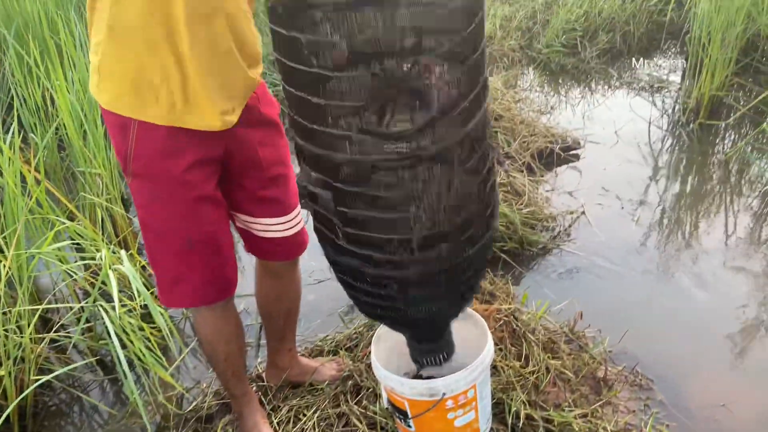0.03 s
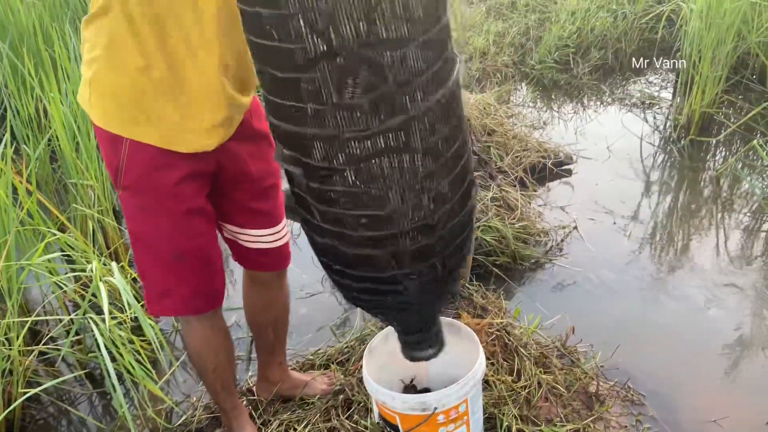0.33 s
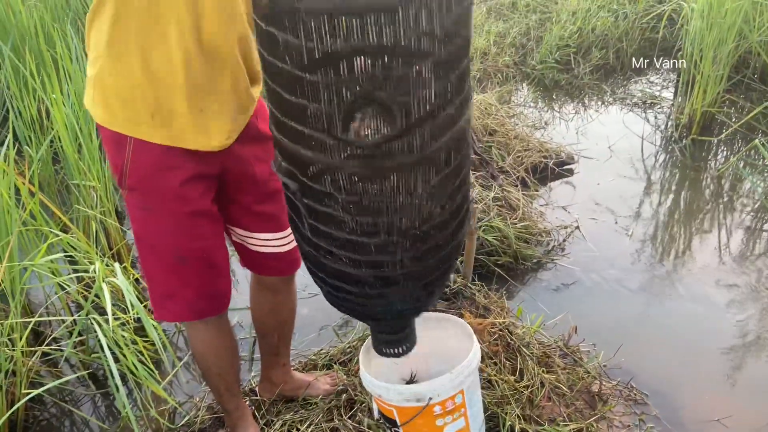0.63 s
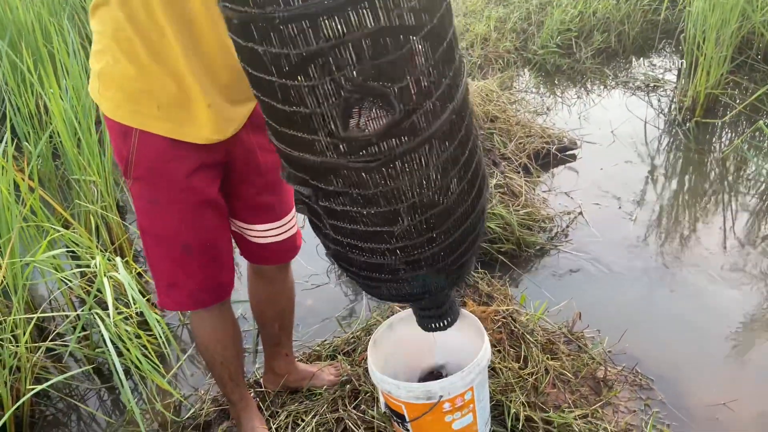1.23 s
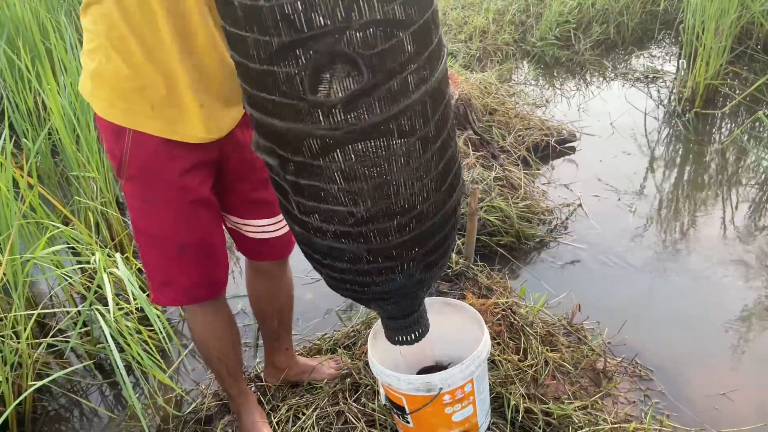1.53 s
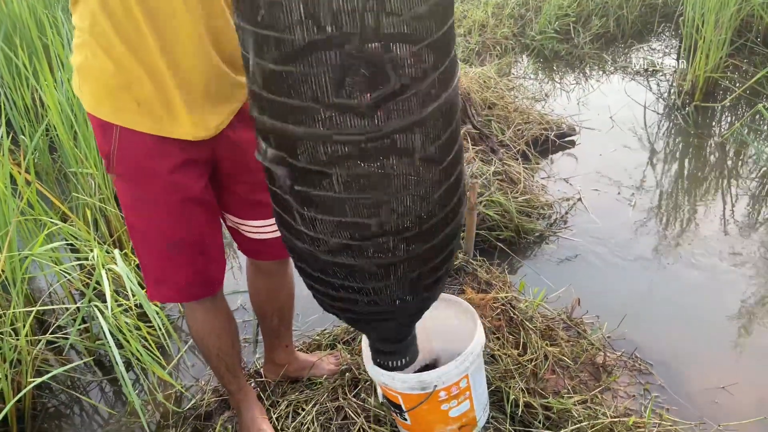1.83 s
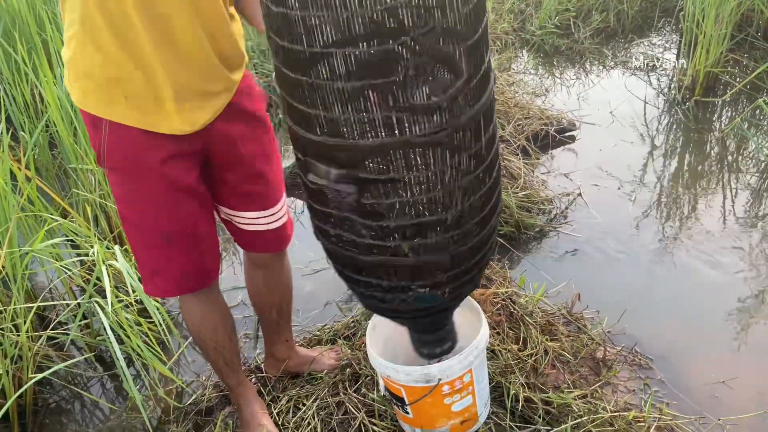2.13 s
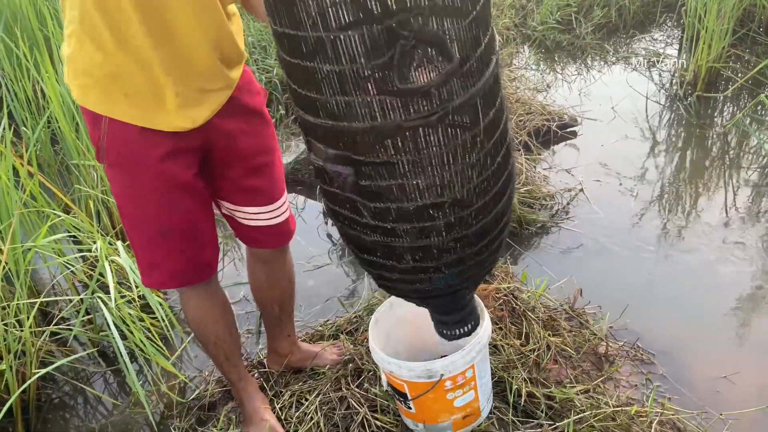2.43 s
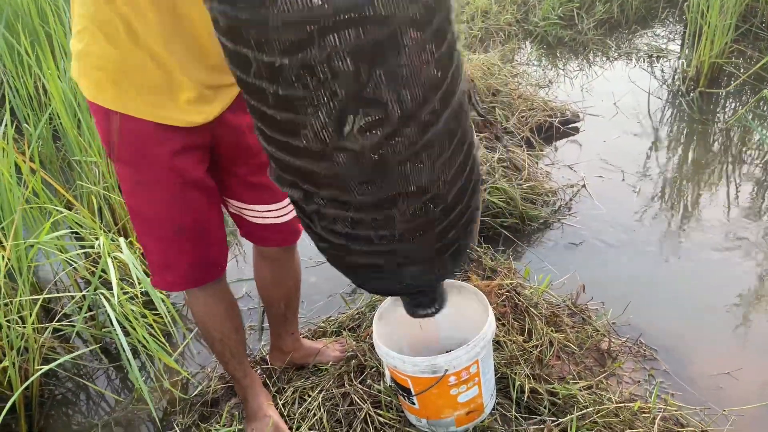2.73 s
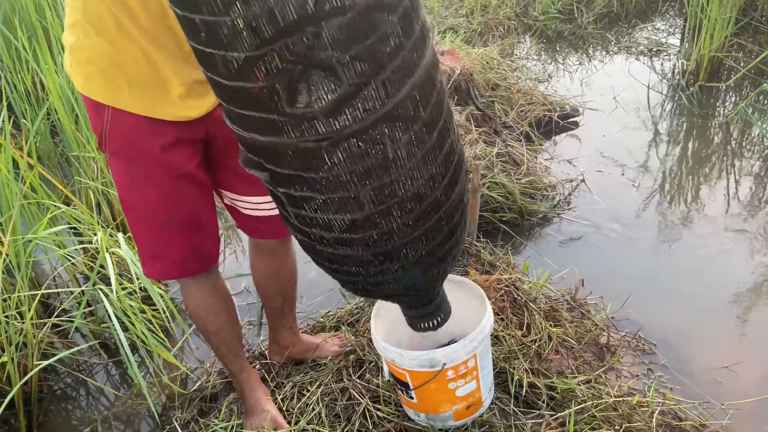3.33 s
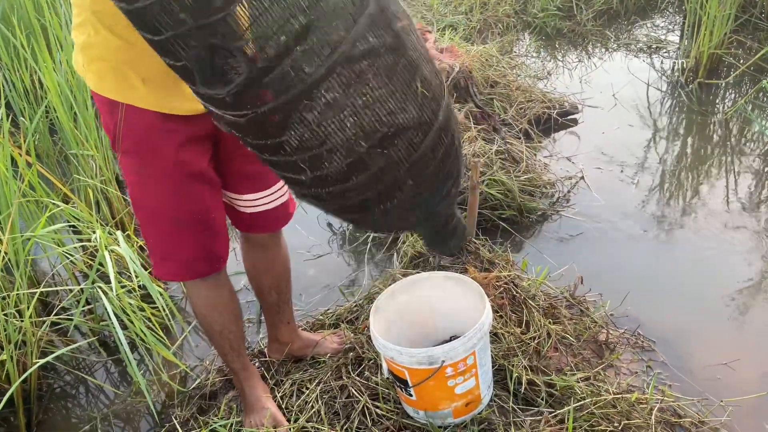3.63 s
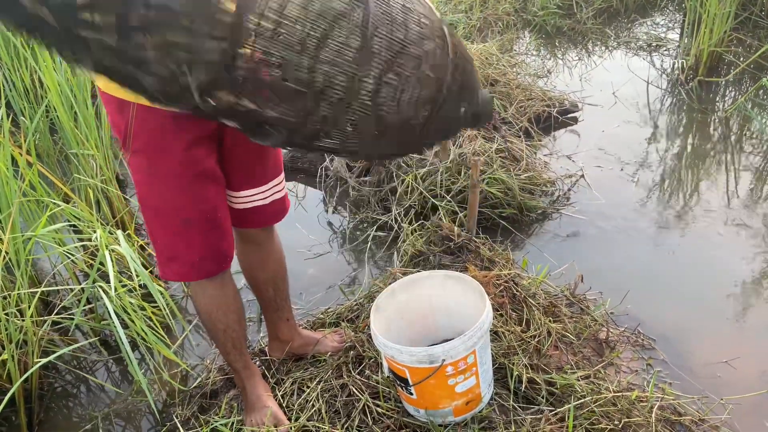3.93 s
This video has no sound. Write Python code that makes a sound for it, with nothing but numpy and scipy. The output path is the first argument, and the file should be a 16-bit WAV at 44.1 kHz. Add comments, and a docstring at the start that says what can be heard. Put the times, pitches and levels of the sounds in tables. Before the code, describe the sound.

A woven fish trap is shaken out close by, its wet catch slithering and bumping in the rustling weave after a light bucket knock at the start. Slats snap sharply near 0.9, 1.6, 2.5 and 2.6 seconds. Around 3 seconds the catch drops into the plastic bucket with hollow knocks; rustles and drips continue until 4 seconds. A cricket chirps over distant insects and a low rumble.

```python
"""A woven fish trap is shaken out over a plastic bucket on a grassy riverbank.
Throughout: low rumble, far insect chorus, a near cricket chirping in runs of wing strokes.
After a first knock of the bucket, the wet catch slithers and bumps in the rustling weave.
Slats spring back with sharp snaps near 0.9, 1.6, 2.5 and 2.6 s.
Near 3 s the catch drops in and rings the bucket; rustle and drips go on to the end."""
import sys
import numpy as np
from scipy import signal
from scipy.fft import rfft, irfft, next_fast_len
from scipy.io import wavfile
from scipy.ndimage import map_coordinates

SR = 44100
rng = np.random.default_rng(int(sys.argv[2]) if len(sys.argv) > 2 else 0)


def wrap_up_sound(samples):
    """Save the sound to the file named by the first command line argument, as 16-bit audio."""
    columns = np.atleast_2d(samples).T
    # keep every value between -1 and 1, then stretch to whole-number steps
    tamed = np.clip(columns, -1, 1)
    steps = np.round(tamed * 32767).astype(np.int16)
    wavfile.write(sys.argv[1], SR, steps)


N = 176400
T = np.arange(N) / SR

# bucket modes (frequency [Hz], level [dB], t60 [s])
BUCKET_MODES = [(276.6, -12, 0.1), (304.4, -4, 0.082), (633, -11, 0.024), (900, -3, 0.094),
                (1115, -24, 0.21), (1410, -23, 0.21), (1857, -5.5, 0.062), (2570, -9.5, 0.044)]
# left-right likeness of the sound field (frequency [Hz], correlation [-])
COHERENCE = [(100, 0.9), (1900, 0.96), (2400, 0.5), (2900, 0.1), (3400, 0.083), (3800, 1), (4400, 0.9),
             (5000, 0.81), (7000, 0.54), (8300, 0.87), (11000, 0.89)]


def amp(db):
    """Decibels to gain."""
    return 10 ** (np.asarray(db) / 20)


def unit(x):
    """Scale to rms 1."""
    return x / np.sqrt(np.mean(x ** 2) + 1e-20)


def along(points, hz):
    """Interpolate (frequency [Hz], value) points on a log axis."""
    f, v = np.transpose(points)
    return np.interp(np.log(hz + 1), np.log(f + 1), v)


def wobble(knots_per_s):
    """Smooth random curve."""
    return map_coordinates(rng.standard_normal(int(N * knots_per_s / SR) + 4), [T * knots_per_s])


def filtered(x, response):
    """Apply a frequency response."""
    n = x.shape[-1]
    m = next_fast_len(n + 4096)
    return irfft(rfft(x, m) * response(np.fft.rfftfreq(m, 1 / SR)), m)[..., :n]


def spread(pair, gain, coherence=COHERENCE):
    """Two unrelated signals to coloured stereo of given coherence."""
    angle = lambda hz: np.arccos(np.clip(along(coherence, hz), -1, 1)) / 2
    mid, side = filtered(pair, lambda hz: gain(hz) * np.array([np.cos(angle(hz)), np.sin(angle(hz))]))
    return np.array([mid + side, mid - side])


def noise(gain, size, coherence=COHERENCE):
    """Coloured stereo noise."""
    return spread(rng.standard_normal((2, size)), gain, coherence)


def envelope(t, attack_s, hold_s, t60_s):
    """Linear rise; exponential fall from hold_s on."""
    return np.clip(t / attack_s, 0, 1) * amp(-60 * np.maximum(t - hold_s, 0) / t60_s)


def add(track, at_s, sound):
    """Mix a sound in."""
    i = max(round(at_s * SR), 0)
    part = sound[..., :max(N - i, 0)]
    track[..., i:i + part.shape[-1]] += part


def outdoors():
    """Far low rumble and faint open air."""
    # spectra (frequency [Hz], level [dB])
    rumble_spectrum = [(28, -38), (43, -5.5), (80, 1), (120, -5.5), (200, -18.5), (1000, -69)]
    air_spectrum = [(100, -3), (400, 1), (1000, -1.5), (2000, -2), (3000, -2.5), (6000, -5.5), (11000, 1.5),
                    (13000, -51)]
    rumble = unit(noise(lambda hz: amp(along(rumble_spectrum, hz)), N))
    air = unit(noise(lambda hz: amp(along(air_spectrum, hz)), N))
    return amp(-47.5 + wobble(4.4)) * rumble + amp(-61) * air


def chorus():
    """Many far insects blur into pulsing bands."""
    # insect bands (centre [Hz], width [Hz], level [dB], left-right correlation [-], pulse rate [Hz])
    bands = [(6980, 240, -51, 0.39, 62), (8980, 320, -55, 0.77, 150), (10664, 420, -55, 1, 110)]
    out = np.zeros((2, N))
    for hz, width_hz, db, coherence, pulse_hz in bands:
        shape = lambda f: (1 + ((f - hz) / (2 * width_hz)) ** 2) ** -2.0
        band = unit(noise(shape, N, [(hz, coherence)]))
        phase = 2 * np.pi * np.cumsum(pulse_hz * (1 + .05 * wobble(20))) / SR
        out += amp(db + wobble(14)) * (1 + .35 * np.sin(phase)) * band
    return out


def cricket(strokes=11, stroke_s=.0085, period_s=.0081, pitch_hz=8490, glide_hz=1630):
    """Each chirp swells through a run of wing strokes; each stroke glides down in pitch."""
    # runs of evenly spaced chirps (first chirp end [s], last chirp end [s], chirps [count])
    runs = [(.049, 2.859, 24), (2.993, 3.497, 5)]
    swell_db, growth_db_per_s = 6, 1
    out, t = np.zeros(N), T[:SR // 80]
    progress = np.clip(t / stroke_s, 0, 1)
    window = np.sin(np.pi * progress) ** 2
    for end_s in np.concatenate([np.linspace(*run) for run in runs]):
        chirp_db = -40 + growth_db_per_s * (end_s - 2)
        for k in range(strokes):  # last stroke first
            late, sharp, loud = rng.standard_normal(3)
            at_s = end_s - k * period_s - stroke_s / 2 + .0003 * late
            hz = pitch_hz + 55 * sharp + glide_hz * (.5 - progress)
            db = chirp_db + loud - swell_db * (k / (strokes - 1)) ** 2.24
            if at_s > 0:
                add(out, at_s, amp(db) * window * np.sin(2 * np.pi * np.cumsum(hz) / SR))
    grass_echo = noise(np.ones_like, SR // 10) * amp(-60 * T[:SR // 10] / .072)
    grass_echo /= np.linalg.norm(grass_echo[0])
    return out + amp(-1) * signal.fftconvolve(out[None], grass_echo, axes=1)[:, :N]


def slat_resonances(depth_db, size=110):
    """Each blow excites the many resonances differently: a random gain over frequency."""
    knots_db = depth_db * rng.standard_normal(size)
    return lambda hz: amp(np.interp(np.sqrt(2 * hz / SR), np.linspace(0, 1, size), knots_db))


def squelches(pops_per_s=110, centre_hz=1476, t60_cycles=8, size=900):
    """Tiny wet pops, each ringing briefly at its own pitch."""
    out, t = np.zeros(N), T[:SR // 25]
    for (when, draw), (pitch, loud) in zip(rng.random((size, 2)), rng.standard_normal((size, 2))):
        if draw < pops_per_s * N / SR / size:
            hz = centre_hz * np.exp(.33 * pitch)
            pop = envelope(t, .001, 0, t60_cycles / hz) * np.sin(2 * np.pi * hz * t)
            add(out, when * N / SR, amp(12.6 * np.tanh(loud)) * pop)
    return unit(out)


def rustle(grains_per_s=150, grain_t60_s=.045, hiss=.75, size=4000):
    """The weave creaks in tiny grains as the wet catch slithers over it in fits and starts."""
    # rustle contour (time [s], level [dB])
    contour = [(0, -57.5), (.56, -60), (.62, -51.5), (.81, -45.5), (.92, -52.5), (1.08, -49), (1.36, -55.5),
               (1.62, -56.5), (1.8, -51), (2.12, -48.5), (2.55, -49.5), (2.92, -48), (3.2, -48.5),
               (3.45, -54), (4, -50.5)]
    # weave spectrum (frequency [Hz], level [dB])
    spectrum = [(100, -9), (280, 4), (450, -10.5), (800, 0.5), (1900, 0.5), (2800, -3), (4500, -7.5),
                (6000, -7.5), (11000, -24), (13500, -54)]
    when, draw, strength = rng.random((3, size))
    active = draw < grains_per_s * N / SR / size
    kicks = np.bincount((when * N).astype(int), active * amp(-3.5 * np.log(strength + .02)), N)
    grains = unit(signal.fftconvolve(kicks, amp(-60 * T[:SR // 20] / grain_t60_s))[:N])
    slats = slat_resonances(1.8)
    friction = rng.standard_normal((2, N)) * (grains + hiss)
    weave = unit(spread(friction, lambda hz: slats(hz) * amp(along(spectrum, hz))))
    wet_weave = amp(-1.5) * weave + amp(-9) * squelches()
    return wet_weave * amp(np.interp(T, *np.transpose(contour)) + wobble(16))


def wet_clicks(t60_cycles=13, spray_db=-2):
    """Wet skin and drops smack on the slats: a short pitched ring with a little spray."""
    # smacks and drips (time [s], level [dB], pitch [Hz])
    smacks = [(0.715, -38, 1650), (0.783, -31.5, 2000), (1.165, -33.5, 1800), (1.221, -39, 1630),
              (1.8565, -28, 1230), (1.917, -39.5, 1460), (2.021, -40, 1730), (2.22, -33, 1950),
              (2.273, -30, 1180), (3.179, -34, 5400), (3.209, -36.5, 1540), (3.286, -36, 1100),
              (3.464, -37, 5300), (3.5384, -39.5, 1560), (3.863, -40, 900)]
    out, t = np.zeros((2, N)), T[:SR // 15]
    for at_s, db, hz in smacks:
        spray = unit(noise(lambda f: 1 / (1 + (2 * np.log((f + 1) / hz)) ** 2), len(t)))
        smack = np.sin(2 * np.pi * hz * t) + amp(spray_db) * spray
        add(out, at_s, amp(db) * envelope(t, .00036, .00058, t60_cycles / hz) * smack)
    return out


def slat_ticks():
    """Single slats click against their binding."""
    # light ticks (time [s], level [dB])
    ticks = [(1.769, -36), (2.340, -33), (2.462, -33.5), (2.502, -36.5), (2.6215, -32), (2.7157, -31),
             (2.849, -35.5), (2.8887, -32), (3.057, -31.5), (3.697, -34.5)]
    # slat spectrum (frequency [Hz], level [dB])
    spectrum = [(300, -5), (1500, 5), (4000, 1), (8000, 1), (11500, 7.5), (13500, -17), (16000, -14)]
    out, t = np.zeros((2, N)), T[:SR // 10]
    for at_s, db in ticks:
        slat = unit(noise(lambda hz: amp(along(spectrum, hz)), len(t)))
        add(out, at_s, amp(db) * envelope(t, .0003, .0012, .022) * slat)
    return out


def stick_slip(t, slips_per_s=420, depth_db=4):
    """A sliding body catches and lets go: a fast uneven gain of rms 1."""
    knots = rng.standard_normal(int(t[-1] * slips_per_s) + 4)
    return unit(amp(depth_db * map_coordinates(knots, [t * slips_per_s])))


def catch_bumps():
    """Wet bodies slap the weave; long contacts die away slowly; the bass builds after the slap."""
    # bumps in the trap (time [s], hold [s], level [dB], bass [dB], treble [dB])
    bumps = [(.103, 0.0018, -38.5, -12, -2.5), (0.271, 0.0036, -46, -18, -7),
             (0.5785, 0.013, -33.5, -0.5, -12), (0.803, 0.04, -44, -7.5, -1), (0.869, 0.0083, -40, 17, -6),
             (0.946, 0.022, -36.5, 9, 4), (1.04, 0.016, -39.5, 4, -9), (1.085, 0.02, -43, 4, -19),
             (1.424, 0.011, -45.5, -12, -1), (1.505, 0.03, -47, -12, -3), (1.646, 0.015, -36, 4, 17),
             (1.728, 0.003, -37.5, 2.5, -6), (1.742, 0.022, -38.5, 1.5, -12),
             (1.851, 0.015, -37.5, 4.5, -0.5), (1.878, 0.027, -42.5, 6.5, 1), (2.082, 0.04, -44, -7, -5),
             (2.604, 0.009, -44.5, 5, -7), (2.747, 0.021, -34, 2.5, -6), (2.903, 0.019, -38, -20, 7),
             (2.9905, 0.023, -31, -7, 0.5), (3.012, 0.0085, -31.5, 1.5, 1), (3.103, 0.0066, -39.5, -15, -5),
             (3.655, 0.015, -43, 5.5, 3.5)]
    # spectrum of the woven body (frequency [Hz], level [dB])
    spectrum = [(60, 1), (150, 5), (280, 6.5), (480, -4.5), (900, 2.5), (1800, 0.5), (2400, -2),
                (5000, -10.5), (10000, -6), (14000, -26)]
    out, t = np.zeros((2, N)), T[:SR // 4]
    first_contact = amp(-1) * np.exp(-t / .0064)
    for at_s, hold_s, db, bass_db, treble_db in bumps:
        tilt = [(300, bass_db), (800, 0), (2000, 0), (4500, treble_db)]
        slats = slat_resonances(4.3)
        body = unit(noise(lambda hz: slats(hz) * amp(along(spectrum, hz) + along(tilt, hz)), len(t)))
        bass = filtered(body, lambda hz: 1 / (1 + (hz / 450) ** 4))
        contact = envelope(t, .00079, hold_s, t60_s=.028 + 5.4 * hold_s)
        slap = (body - bass) * contact * (.8 * stick_slip(t) + first_contact)
        thud = bass * envelope(t, .008, hold_s, t60_s=.11)
        add(out, at_s, amp(db - 1) * (slap + thud))
    return out


def bucket_resonance(x, ring_db=1):
    """The open bucket resonates with the sound above it."""
    def response(f):
        return sum(amp(db) * 1j * f * (3 / t60_s) / (hz * hz - f * f + 1j * f * (3 / t60_s))
                   for hz, db, t60_s in BUCKET_MODES)
    return x + amp(ring_db) * filtered(x, response)


def bucket_landings():
    """Each landing of the catch rings the damped plastic."""
    # impacts (time [s], level [dB], brightness [dB])
    landings = [(.005, -37.5, -15), (0.5817, -47, 14), (1.7299, -43, 7), (2.757, -35, 1.5),
                (2.958, -24, -13), (2.9944, -34.5, 9.5), (3.001, -18, -9), (3.0132, -32.5, -5.5)]
    out, t = np.zeros(N), T[:SR // 3]
    for at_s, db, bright_db in landings:
        for hz, mode_db, t60_s in BUCKET_MODES:
            gain = amp(db + mode_db + along([(350, 0), (900, bright_db)], hz) + rng.normal(0, .7))
            ring = np.sin(2 * np.pi * hz * (1 + rng.normal(0, .017)) * t)
            add(out, at_s, gain * envelope(t, .94 / hz, .41 / hz, t60_s) * ring)
    return out


def slat_snaps(ring_db=11, ring_width_hz=260, rebound_s=.0139, rebound_db=-19.5, rattle_db=-11):
    """A slat springs back: a crack at its own pitch, a weak rebound, a short rattle of the weave."""
    # snaps (time [s], hold [s], low [dB], mid [dB], high [dB], top [dB], ring [Hz])
    snaps = [(0.9488, 0.0038, -13, -21.5, -24, -16.5, 3060), (1.641, 0.0038, -12.5, -20, -21, -10, 3290),
             (2.5134, 0.0025, -35, -18, -23, -7, 3580), (2.6336, 0.0045, -21.5, -32, -15, -12, 4450)]
    out, t = np.zeros((2, N)), T[:SR // 6]
    sheen_db = lambda hz: 4.5 / (1 + ((hz - 10030) / 700) ** 2)  # resonance shared by all slats
    for at_s, hold_s, low, mid, high, top, ring_hz in snaps:
        spectrum = [(80, low - 10), (300, low), (1200, mid), (2600, mid - 1), (4200, high),
                    (8500, (high + top) / 2), (11500, top - 2), (13500, top - 20), (16000, top - 17)]
        peak_db = lambda hz: ring_db / (1 + ((hz - ring_hz) / ring_width_hz) ** 2)
        gain = lambda hz: amp(along(spectrum, hz) + sheen_db(hz) + peak_db(hz))
        strike = envelope(t, .0012, hold_s, t60_s=.027)
        rebound = amp(rebound_db) * envelope(t - rebound_s, .0012, hold_s, t60_s=.027)
        crack = filtered((strike + rebound) * noise(gain, len(t)), slat_resonances(2.03))
        weave = noise(lambda hz: gain(hz) / (1 + (hz / 12000) ** 16), len(t))
        rattle = envelope(t, .0032, hold_s, t60_s=.065) * weave
        add(out, at_s, amp(-3.5) * (crack + amp(rattle_db) * rattle))
    return out


def scene():
    """Trap and bucket in front, insects all round."""
    trap = slat_snaps() + bucket_resonance(catch_bumps() + rustle()) + slat_ticks() + wet_clicks()
    return trap + bucket_landings() + cricket() + chorus() + outdoors()


def record(dry):
    """Band-limited microphone; its two ports differ in phase and level."""
    # port differences (frequency [Hz], left lead [rad], left minus right [dB])
    ports = [(60, 0, 2.2), (280, 0, 4.6), (700, -.1, -.3), (1900, .05, -.3), (2350, 1.6, -.5),
             (3000, 1.6, 0), (3600, -.5, 1), (4300, 0, 1.2), (4800, .8, 1.5), (7300, .8, 3),
             (8600, -.05, -.1), (9400, -1.7, 0), (10250, -3.1, 0), (11500, -5.7, 0), (12400, -6.6, 0)]
    # microphone response (frequency [Hz], level [dB])
    mic_response = [(18, -36), (42, 0), (3500, -0.5), (4200, 1), (5000, -2), (8800, 0), (9600, 4),
                    (12400, -4), (13600, -21), (15200, -7.5), (16400, -20)]
    limit_hz = 16400
    lead_rad, balance_db = np.array(ports)[:, [0, 1]], np.array(ports)[:, [0, 2]]
    sides = np.array([[.5], [-.5]])
    pair = lambda hz: np.exp(1j * sides * along(lead_rad, hz)) * amp(sides * along(balance_db, hz))
    return filtered(dry, lambda hz: pair(hz) * amp(along(mic_response, hz)) * (hz < limit_hz))


dry = scene()
out = record(dry)
wrap_up_sound(out)
```